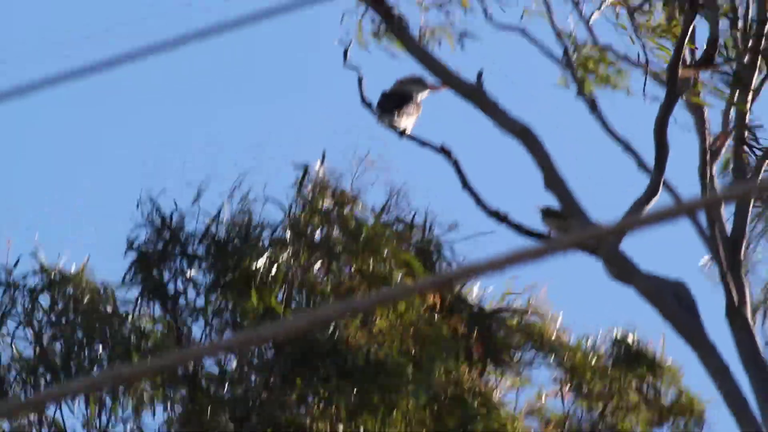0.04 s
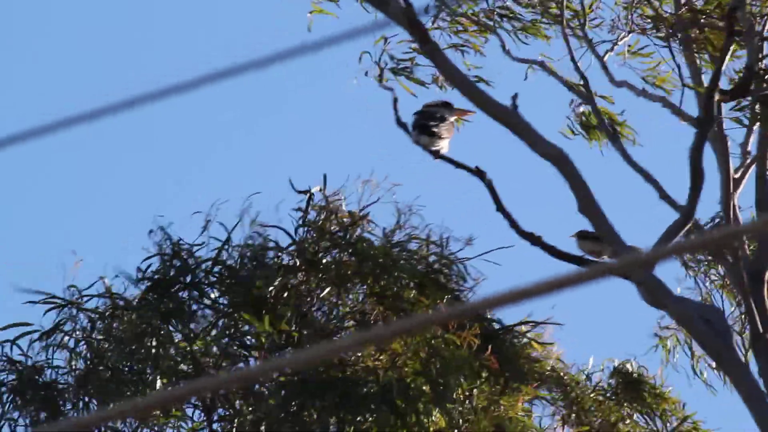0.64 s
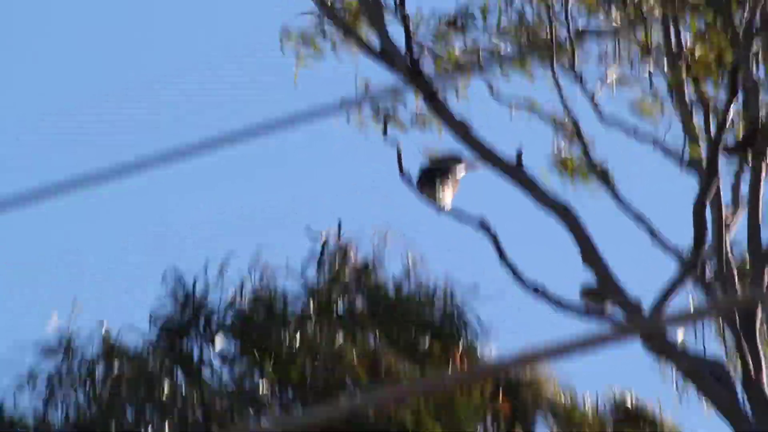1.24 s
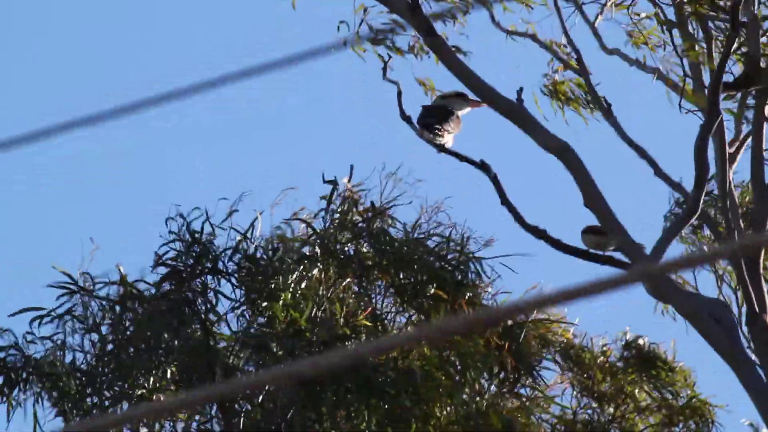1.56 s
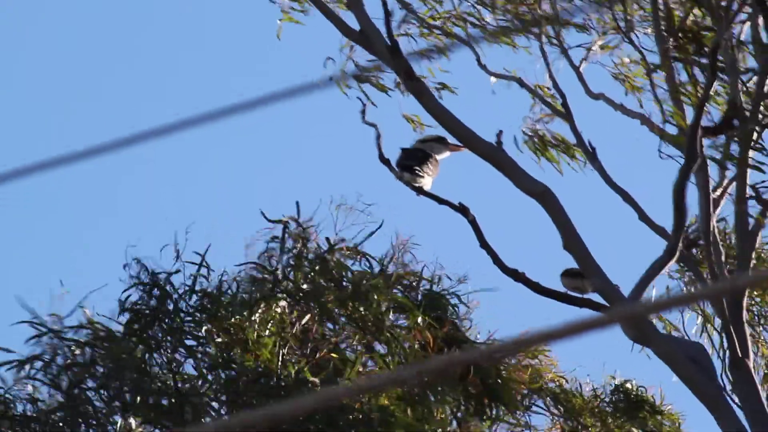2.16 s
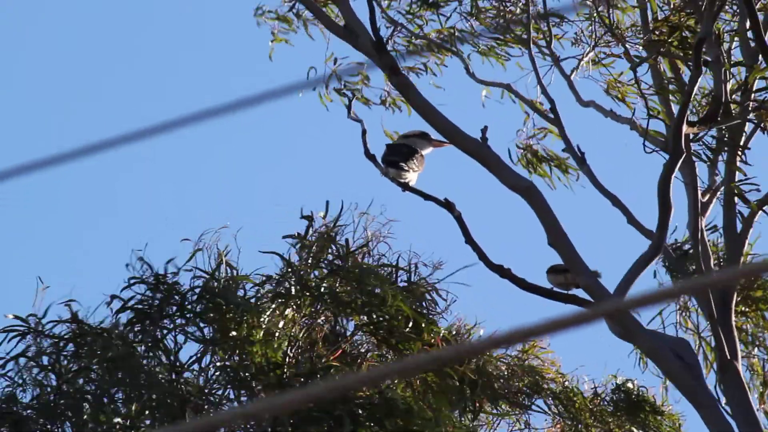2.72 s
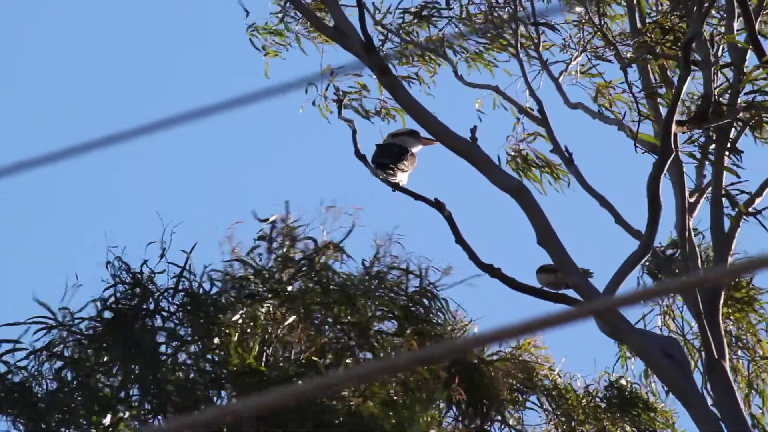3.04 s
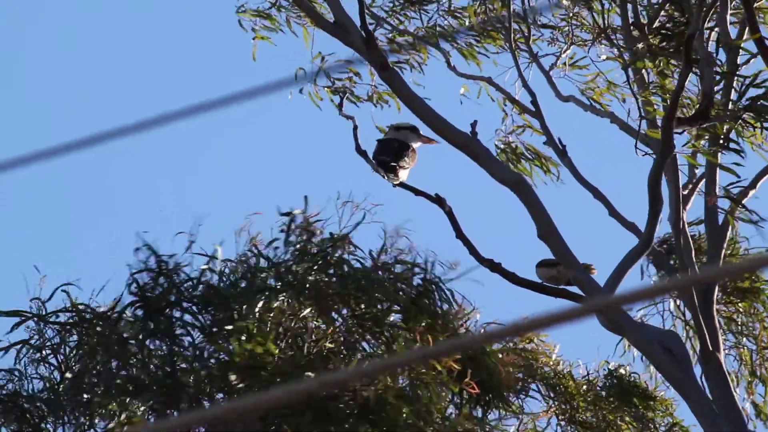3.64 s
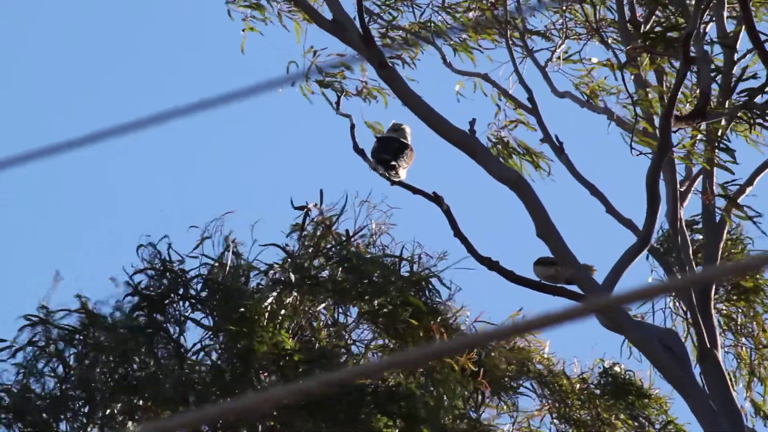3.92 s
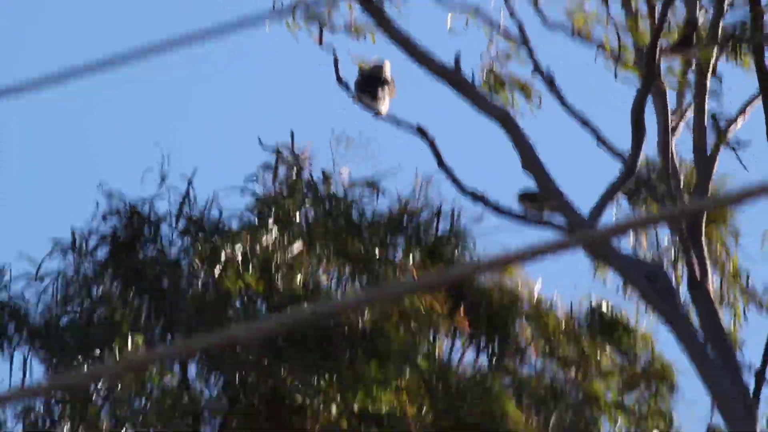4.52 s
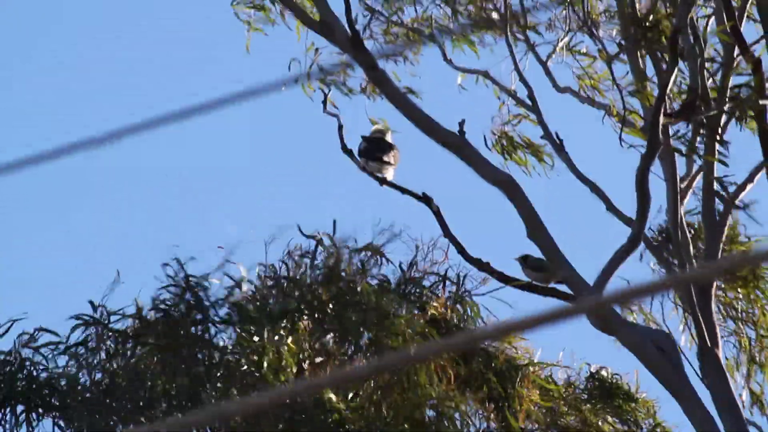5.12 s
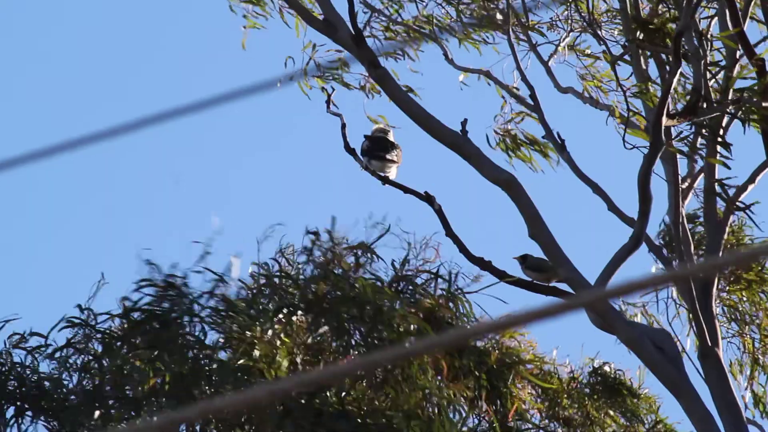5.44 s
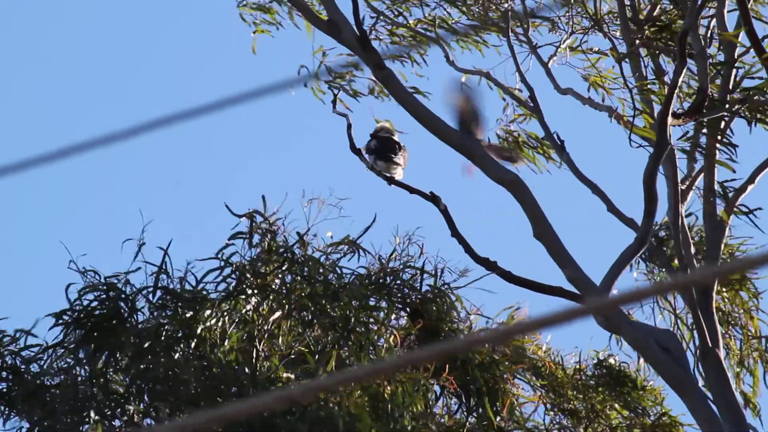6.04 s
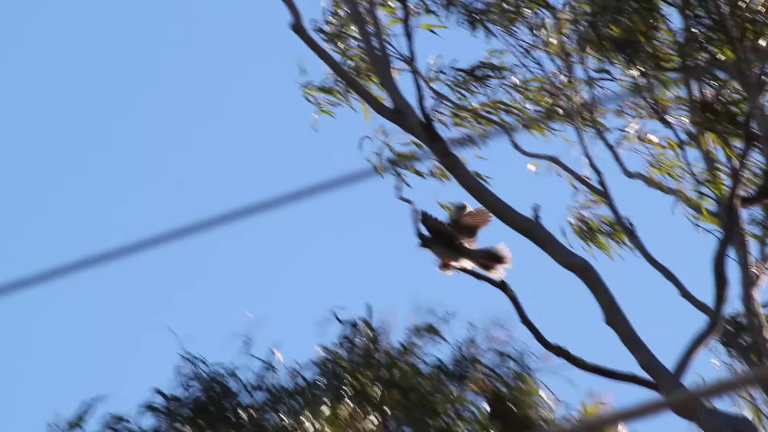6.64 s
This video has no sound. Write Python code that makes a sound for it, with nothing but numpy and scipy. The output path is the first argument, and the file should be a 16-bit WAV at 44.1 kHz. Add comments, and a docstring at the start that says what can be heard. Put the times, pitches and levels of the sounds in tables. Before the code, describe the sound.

Short bird chirps and raspy calls outdoors grow closer, with swelling tyre noise and then heavy wind rumbling on the microphone.

```python
"""Small birds in the gum trees, on one microphone: chirps, raspy scolds and rising whistles draw nearer.
Each call is a whistle of the syrinx, coloured by throat and beak and echoed by leaves and trunks.
Some way off, the tyre roar of a car swells as it approaches. In the last seconds gusts buffet the
microphone and pull its gain down. Under it all lie the open air, one faint knock and, from the
camera itself, a few dry ticks and a thin, very high whine."""
import sys
import numpy as np
from scipy import signal
from scipy.fft import rfft, irfft, next_fast_len
from scipy.io import wavfile
from scipy.ndimage import uniform_filter1d, map_coordinates

SR = 44100
rng = np.random.default_rng(int(sys.argv[2]) if len(sys.argv) > 2 else 0)


def bounce(signal):
    """Save signal as a 16-bit WAV file at the path given by the first command-line argument."""
    frames = np.transpose(np.atleast_2d(signal))
    limited = np.clip(frames, -1, 1)
    pcm = np.round(limited * 32767).astype(np.int16)
    wavfile.write(sys.argv[1], SR, pcm)


N = 298557
TOP_HZ = 15900


# Chirps in the nearer trees: start_s, length_s, first_hz, last_hz, level_db, rasp (0-1), overtone_db
NEAR_CHIRPS = [(0.053, 0.056, 3080, 2840, -54, 0.2, -8), (0.198, 0.034, 2950, 3380, -50, 0, -8),
               (0.337, 0.071, 3300, 3690, -46.5, 0.4, 0), (1.747, 0.065, 3050, 2600, -44, .4, -6),
               (1.826, 0.099, 2720, 2934, -42, 0.23, 2.5), (1.899, .044, 2995, 2670, -43, 0.2, 8.5),
               (2.338, 0.018, 4300, 3970, -40, 0.44, -8), (2.36, 0.049, 3500, 3590, -45.5, .05, -8),
               (2.709, .055, 2874, 2720, -48, 0, 0), (2.83, 0.037, 2200, 2260, -50.5, 0.1, 3.5),
               (2.858, 0.054, 3200, 2870, -44.5, 0.5, -1), (2.968, .043, 2310, 2910, -47, 0.07, 5.5),
               (3.625, 0.039, 2956, 2930, -43.5, 0.2, -1), (3.655, .042, 3930, 4050, -49, .3, 5),
               (3.698, .06, 3080, 2980, -46.5, 0.2, 0), (3.743, 0.037, 4480, 4350, -52, .05, -8),
               (3.844, 0.056, 2740, 2693, -45, 0.18, 4.5), (3.849, 0.052, 4200, 3600, -42, 0, -2),
               (3.899, 0.0573, 4200, 4360, -40.5, .12, 5), (3.956, .037, 3770, 3620, -46, 0.3, -6),
               (4.346, 0.042, 2380, 2120, -48, .15, -2.5), (4.825, .058, 2125, 2148, -35, 0.1, -3.5),
               (5.189, 0.026, 2410, 2110, -42.5, 0, -1.5), (6.175, 0.023, 2580, 2600, -34, .1, 4.5),
               (6.198, 0.031, 2440, 2406, -29, .05, 2.5), (6.229, 0.092, 3493, 3650, -24.5, 0, -1)]
# Rising whistles: start_s, length_s, climb_s, first_hz, knee_hz, last_hz, level_db, overtone_db
NEAR_SQUEALS = [(3.01, .125, .04, 2860, 2990, 3013, -39.5, 6),
                (3.944, 0.077, .035, 2880, 2993, 3155, -42, 10.5),
                (4.891, 0.13, .058, 2440, 2774, 3000, -37.5, 12.5),
                (6.288, .099, .05, 2757, 2800, 2970, -31, 12.5),
                (6.636, 0.11, .072, 2664, 3080, 3070, -34.5, 7.5)]
# Raspy scolds: start_s, length_s, pitch_hz, level_db
NEAR_SCOLDS = [(0.749, 0.12, 3860, -43.5), (0.985, .132, 3840, -42.5), (1.251, .134, 3750, -42),
               (2.215, 0.14, 3650, -41.5), (4.66, .11, 3730, -47)]
# Feed to the echo, greater for distant birds: time_s, level_db
ECHO_SEND = [(0, -1.5), (1.3, -9.5), (1.9, -12.5), (2.3, -8.5), (3, -5), (4, -1), (5, -4.5), (6.2, -15),
             (6.77, -6)]

def birds(direct_db=-1, far_direct_db=-6):
    """All the calls and their echo in the trees; the far flock is heard more by its echo."""
    near, far = np.zeros(N), far_flock()
    for s, length, first_hz, last_hz, db, rasp, overtone_db in NEAR_CHIRPS:
        add(near, s, amp(db) * chirp(length, first_hz, last_hz, rasp, overtone_db))
    for s, length, climb, first_hz, knee_hz, last_hz, db, overtone_db in NEAR_SQUEALS:
        add(near, s, amp(db) * squeal(length, climb, first_hz, knee_hz, last_hz, overtone_db))
    for s, length, hz, db in NEAR_SCOLDS:
        add(near, s, amp(db) * scold(length, hz))
    echo = foliage((near + far) * amp(curve(ECHO_SEND)))
    return amp(direct_db) * near + amp(far_direct_db) * far + echo


def chirp(length, first_hz, last_hz, rasp, overtone_db, bend_per_s2=38):
    """A short arched glide; all share one curvature, so long ones arch higher."""
    t = clock(length)
    arch = 1 + bend_per_s2 * t * (t[-1] - t)
    return syrinx(np.linspace(first_hz, last_hz, len(t)) * arch, rasp, overtone_db)


def squeal(length, climb, first_hz, knee_hz, last_hz, overtone_db, effort_db_per_octave=22.5):
    """A bright whistle that climbs quickly to a knee, then creeps on, louder the higher it is."""
    pitch = np.interp(clock(length), [0, climb, length], [first_hz, knee_hz, last_hz])
    effort = amp(effort_db_per_octave * np.log2(pitch / last_hz))
    return effort * syrinx(pitch, rasp=0.02, overtone_db=overtone_db, swell_db=3.5)


def scold(length, hz, sag_hz_per_s=1245):
    """A harsh call that swells and fades on a slightly sagging pitch."""
    pitch = hz - sag_hz_per_s * (clock(length) - length / 2)
    return syrinx(pitch, rasp=0.897, overtone_db=-2, edge_s=0.015, swell_db=8.5)


# What throat and beak let through: frequency_hz, gain_db
THROAT_RESPONSE = [(2000, -9.5), (2450, -1), (2900, -0.5), (3900, 0.5), (4900, 0.5), (5800, -12),
                   (7600, -21), (8800, -25.5), (11500, -25.5), (15000, -42)]

def syrinx(pitch, rasp, overtone_db, edge_s=0.00074, swell_db=4, rasp_hz=720):
    """A whistle coloured by the throat; a second, unsteady vibration splits a raspy one into sidebands."""
    size = len(pitch)
    t = np.arange(size) / SR
    waver = (.005 + .015 * rasp) * wobble(190, size) + (.008 + .045 * rasp ** 2) * wobble(2600, size)
    rattle = 1.35 * rasp * np.sin(phase_of(rasp_hz * (1 + .12 * wobble(420, size))))
    phase = phase_of(pitch * (1 + waver)) + rattle
    tone = np.zeros(size)
    for k in range(1, 6):
        gain = amp(along(THROAT_RESPONSE, k * pitch) + overtone_db * (k > 1))
        tone += gain * np.sin(k * phase) * (k * pitch < TOP_HZ)
    gate = np.sin(np.pi / 2 * np.clip(np.minimum(t, t[-1] - t) / edge_s, 0, 1)) ** 2
    flutter = amp(2 * wobble(140, size) + (.8 + 1.8 * rasp) * wobble(1500, size))
    swell = amp(swell_db * (np.sin(np.pi * t / t[-1]) - 2 / np.pi))  # strongest in mid note
    return np.sqrt(2) * gate * flutter * swell * tone


# Twitter from deeper in the trees: start_s, end_s, middle_hz, level_db
FAR_BOUTS = [(0.0, .5, 3127, -53.5), (0.548, 1.451, 3210, -50.5), (1.55, 1.75, 2994, -47.5),
             (2.452, 2.945, 4000, -52.5), (3.195, 3.49, 3560, -56.5), (3.577, 4.05, 3710, -48.5),
             (4.106, 6.204, 3400, -58)]

def far_flock(chirps_per_s=16, spread_db=7.5, range_hz=650, glide=0.0784, length_s=.05):
    """More birds of the flock twitter in loose bouts, farther from the microphone."""
    out = np.zeros(N)
    for start, end, middle_hz, db in FAR_BOUTS:
        count = max(round((end - start) * chirps_per_s), 1)
        for k in range(count):
            slip, height, slope, stretch, faintness = rng.uniform(-1, 1, size=5)
            hz = middle_hz + range_hz * height
            first_hz, last_hz = hz * (1 - glide * slope), hz * (1 + glide * slope)
            call = chirp(length_s * (1 + 0.288 * stretch), first_hz, last_hz, rasp=0.23, overtone_db=-1)
            s = start + (end - start) * (k + abs(slip)) / (count + 1)
            add(out, s, amp(db - spread_db * faintness) * call)
    return out


# How long the trees ring: frequency_hz, t60_s
TREE_DECAY = [(500, 0.58), (3000, 0.66), (6000, 0.61), (12000, 0.41)]
# What the leaves throw back: frequency_hz, gain_db
LEAF_SCATTER = [(1500, 5.5), (3000, -1), (4500, -1.5), (6000, 2.5), (9000, -3.5), (14000, 2.5)]

def foliage(calls, build_s=0.001, stir=0.95):
    """Leaves and trunks scatter a call into a tail; the stirring leaves blur its pitch."""
    hz, t, noise = signal.stft(rng.standard_normal(SR), SR, nperseg=256)
    fade = amp(-60 * t / along(TREE_DECAY, hz)[:, None]) * (1 - np.exp(-t / build_s))
    tail = signal.istft(noise * fade, SR, nperseg=256)[1]
    echo = signal.fftconvolve(calls, tail / np.linalg.norm(tail))[:N]
    bands = signal.stft(echo, nperseg=256)[2]
    # each band fades on its own
    shimmer = 1.06 + stir * (rng.standard_normal(bands.shape) + 1j * rng.standard_normal(bands.shape))
    return signal.istft(bands * shimmer * amp(along(LEAF_SCATTER, hz))[:, None], nperseg=256)[1][:N]


# Turbulence right on the microphone: frequency_hz, density_db
BUFFET_SPECTRUM = [(20, -33), (40, -15), (65, -7.5), (110, -1), (180, -1), (300, -4), (450, -11),
                   (700, -20.5), (1200, -34.5), (2500, -53.5), (6000, -71), (15000, -87)]
# Single eddies hitting its port: time_s, level_db, half_width_s
EDDIES = [(4.169, -30.5, .0021), (4.688, -9, 0.00075), (4.85, -5, .00084), (5.094, 5, 0.00081),
          (5.256, 3.5, 0.0013), (5.315, 5, 0.00048), (5.363, 11, .0013), (5.407, 9.5, 0.00076),
          (5.428, 2, .00037), (5.607, -0.5, 0.00085), (5.648, 8, 0.00099), (5.817, -7, 0.00026),
          (5.832, -0.5, 0.00046), (6.074, 0.5, 0.00079), (6.112, 1, 0.0012), (6.495, -1.5, 0.00079),
          (6.733, 6.5, 0.0007)]

def wind(level_db=-2, lump_db=4.5, eddy_db=-1, reach_s=.01):
    """Lumpy turbulence at the microphone port, with single pressure swings from the strongest eddies."""
    turbulence = unit(amp(lump_db * wobble(90)) * rush(BUFFET_SPECTRUM, patchy_db=0))
    out = amp(level_db) * wind_strength() * turbulence
    t = np.arange(-reach_s, reach_s, 1 / SR)
    for s, db, half_width in EDDIES:
        u = t / half_width
        lean = rng.uniform(-0.22, 1.0)
        swing = (1 - u ** 2 + lean * u) * np.exp(-u ** 2 / 2)
        add(out, s - reach_s, amp(db + eddy_db) * rng.choice([-1, 1]) * swing)
    return out


# Gusts at the microphone: start_s, length_s, level_db
MIC_GUSTS = [(4.42, .09, -40.5), (4.494, .08, -41), (4.827, 0.057, -19), (4.926, 0.035, -15.5),
             (5.073, 0.074, -18), (5.169, 0.31, -10), (5.585, .09, -5), (5.769, 0.119, -6),
             (5.892, 0.14, -13.5), (6.077, 0.11, -14.5), (6.227, 0.052, -22), (6.379, 0.091, -23.5),
             (6.517, 0.12, -15), (6.723, 0.024, -8)]
# The wind between them: time_s, level_db
BREEZE_LEVEL = [(4.1, -58.5), (4.78, -30.5), (5.1, -17), (5.55, -14.5), (6.05, -21), (6.3, -32.5),
                (6.77, -34)]

def wind_strength(attack_s=0.013, release_s=0.0093):
    """Each gust rises, holds and dies away on top of the breeze."""
    t, gusts = np.arange(N) / SR, np.zeros(N)
    for s, length, db in MIC_GUSTS:
        rise = np.clip((t - s) / attack_s, 0, 1)
        fall = np.exp(-np.maximum(t - s - length, 0) / release_s)
        gusts += amp(db) * rise * fall
    return np.hypot(amp(curve(BREEZE_LEVEL)), gusts)


# The car's approach, heard from the trees: time_s, level_db
CAR_LEVEL = [(0, -47.5), (2.3, -57.5), (3, -44), (4, -41), (4.7, -37), (5.2, -36.5), (5.8, -35), (6.1, -30),
             (6.5, -27.5), (6.77, -28)]
# Its tyres at that distance: frequency_hz, density_db
TYRE_SPECTRUM = [(40, 2.5), (120, -16), (280, 2.5), (520, -6), (880, 3), (1250, -7), (1700, -10.5),
                 (2500, -18), (4000, -24), (8000, -40.5), (15000, -57)]

def car():
    """Tyres roar on a road some way off, swelling as the car comes closer."""
    return amp(curve(CAR_LEVEL) + 0.21 * wobble(8)) * rush(TYRE_SPECTRUM, patchy_db=1.0)


# Dry ticks on the camera: start_s, level_db
CAMERA_TICKS = [(0.04, -25), (0.3895, -26.5), (0.425, -30.5), (0.4892, -27), (0.575, -29.5), (0.7305, -25),
                (0.772, -25), (1.226, -31), (1.575, -27), (1.7464, -25.5), (4.728, -25.5), (4.751, -25),
                (6.4466, -23.5)]
# The ring of each tick: pitch_hz, level_db, t60_s
CAMERA_MODES = [(1600, -3, .016), (3200, -6, .012), (4400, 0, .016), (5600, -3, .012)]

def ticks(crack_t60_s=.016, attack_s=.0002, cutoff_hz=8500):
    """Each tick is a short, softened crack and a few quickly damped modes."""
    out, t = np.zeros(N), np.arange(SR // 25) / SR
    onset = 1 - np.exp(-t / attack_s)
    for s, db in CAMERA_TICKS:
        ring = np.zeros(len(t))
        for hz, mode_db, t60 in CAMERA_MODES:
            decay = amp(mode_db + rng.normal(0, 0.8) - 60 * t / t60)
            ring += decay * np.sin(2 * np.pi * hz * rng.normal(1, 0.022) * t)
        crack = amp(-60 * t / crack_t60_s) * rng.standard_normal(len(t))
        add(out, s + .001, amp(db) * (.5 * ring + .45 * crack) * onset)
    return filtered(out, lambda hz: 1 / (1 + (hz / cutoff_hz) ** 3))


def knock(start_s=3.377, level_db=-31, pitch_hz=780, t60_s=0.051):
    """One faint, hollow knock: a single damped mode."""
    t = np.maximum(np.arange(N) / SR - start_s, 0)
    return amp(level_db - 60 * t / t60_s) * np.sin(2 * np.pi * pitch_hz * t)


# The camera's own whine: time_s, level_db
WHINE_LEVEL = [(0.0, -46), (0.19, -52), (0.4, -45.5), (1.83, -52), (1.9, -44), (2.45, -56.5), (2.68, -48),
               (3.07, -56), (3.15, -72), (3.32, -58.5), (4.58, -47), (5.17, -53), (5.26, -70), (5.32, -56),
               (5.88, -58), (6.49, -44.5), (6.71, -45.5), (6.77, -59)]

def whine(pitch_hz=15698, level_db=1, wander_db=2.5):
    """A thin, very high tone whose strength wanders."""
    strength = amp(curve(WHINE_LEVEL) + level_db + wander_db * wobble(18))
    return np.sqrt(2) * strength * np.sin(phase_of(pitch_hz + wobble(5)))


# The open air all around: frequency_hz, density_db
AIR_SPECTRUM = [(20, -31), (50, -1), (110, -1), (280, -0.5), (400, -4.5), (600, -4.5), (900, -5),
                (1300, -8), (2000, -14), (3500, -14), (5000, -23), (6500, -27), (10000, -29.5),
                (15000, -38.5)]

def air(level_db=-41.5):
    """The soft, steady rush of the outdoors."""
    return amp(level_db + 0.22 * wobble(13)) * rush(AIR_SPECTRUM, patchy_db=1.1)


def amp(db):
    """Decibels to gain."""
    return 10 ** (np.asarray(db) / 20)


def unit(x):
    """x at rms 1."""
    return x / np.sqrt(np.mean(x ** 2) + 1e-20)


def clock(length):
    """Sample times of one note."""
    return np.arange(int(max(length, .01) * SR)) / SR


def phase_of(hz):
    """Running phase of a changing pitch, in radians."""
    return 2 * np.pi * np.cumsum(hz) / SR


def along(points, hz):
    """(frequency_hz, value) points read on a log axis."""
    frequencies, values = np.transpose(points)
    return np.interp(np.log(hz + 1), np.log(frequencies), values)


def curve(rows):
    """(time_s, value) rows as one value per sample."""
    return np.interp(np.arange(N) / SR, *np.transpose(rows))


def wobble(rate, size=N):
    """A smooth random curve, rate knots a second."""
    knots = rng.standard_normal(int(size * rate / SR) + 4)
    return map_coordinates(knots, [np.arange(size) * rate / SR])


def filtered(x, response):
    """x shaped by a gain that depends on frequency."""
    padded = next_fast_len(N + 8192)
    return irfft(rfft(x, padded) * response(np.fft.rfftfreq(padded, 1 / SR)), padded)[:N]


def rush(spectrum, patchy_db):
    """Coloured noise of rms 1 with patches of random gain."""
    bands = signal.stft(rng.standard_normal(N), nperseg=512)[2]
    patches = uniform_filter1d(rng.standard_normal(bands.shape), size=5, axis=0)
    patches = uniform_filter1d(patches, size=14, axis=1)
    noise = signal.istft(bands * amp(patchy_db * unit(patches)), nperseg=512)[1][:N]
    return unit(filtered(noise, lambda hz: amp(along(spectrum, hz))))


def add(track, s, sound):
    """Mix a sound into the track at time s."""
    start = int(np.clip(round(s * SR), 0, N - 1))
    track[start:start + len(sound)] += sound[:N - start]


def gain_control(x, threshold_db=-10.5, slope=0.78, release_db_per_s=10):
    """Loud gusts push the camera's gain down at once; it recovers slowly."""
    level_db = 10 * np.log10(np.abs(uniform_filter1d(x ** 2, size=1300)) + 1e-12)
    excess_db = np.maximum(level_db - threshold_db, 0)
    recovery_db = release_db_per_s * np.arange(N) / SR
    cut_db = np.maximum.accumulate(slope * excess_db + recovery_db) - recovery_db
    return x * amp(-uniform_filter1d(cut_db, size=300))


def scene():
    """Everything that reaches the single microphone by the trees."""
    return (birds() + air() + car() + wind() + ticks() + knock())[None]


def record(dry, low_cut_hz=28):
    """The camera: gain control, its own whine, clipping, the low cut and the band limit."""
    x = gain_control(dry[0]) + whine()
    x = x / (1 + np.abs(x) ** 8) ** (1 / 8)  # soft clip at full scale
    return filtered(x, lambda hz: (hz < TOP_HZ) * hz ** 4 / (hz ** 4 + low_cut_hz ** 4))[None]


dry = scene()
out = record(dry)
bounce(out)
```